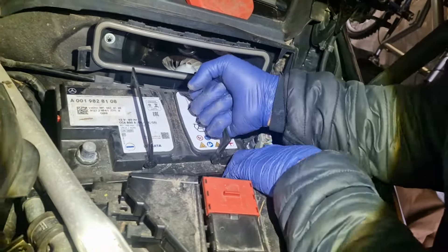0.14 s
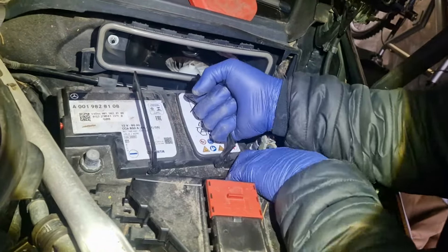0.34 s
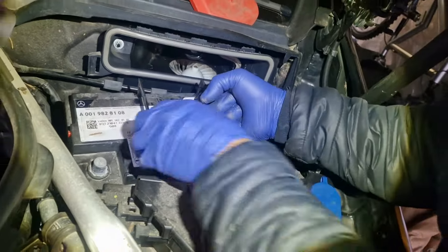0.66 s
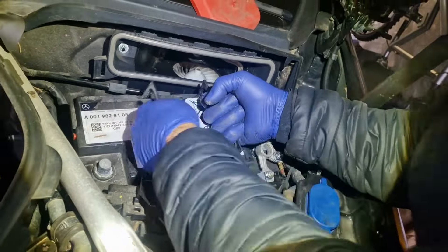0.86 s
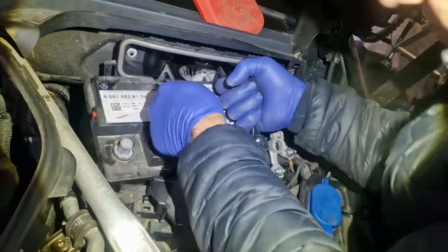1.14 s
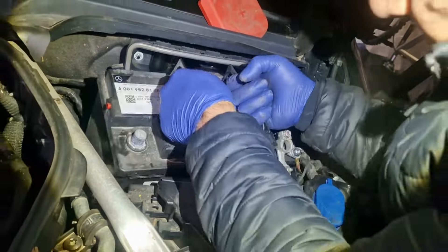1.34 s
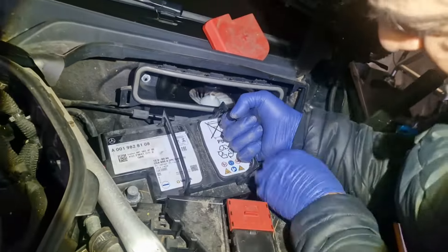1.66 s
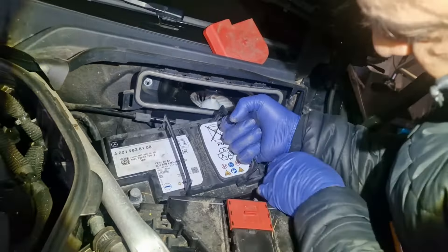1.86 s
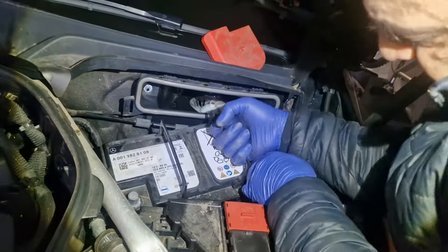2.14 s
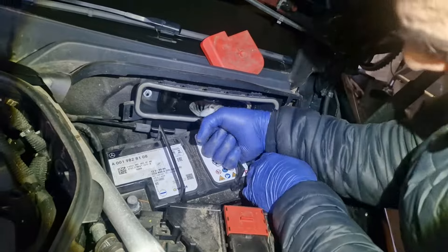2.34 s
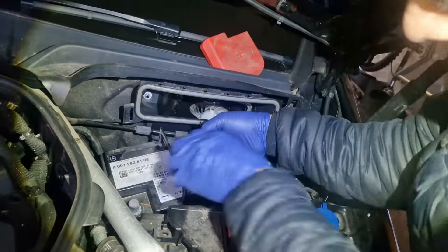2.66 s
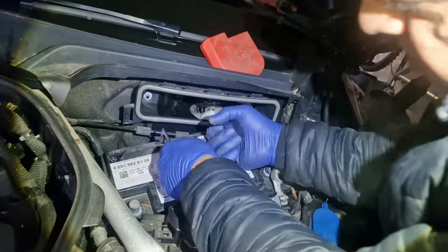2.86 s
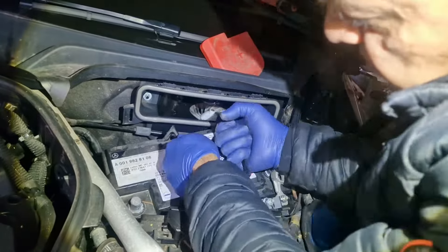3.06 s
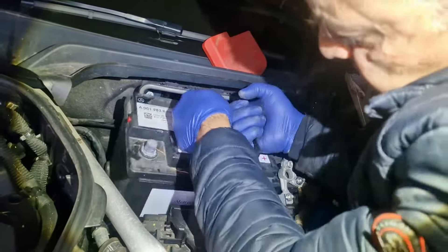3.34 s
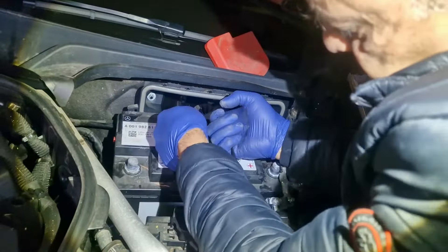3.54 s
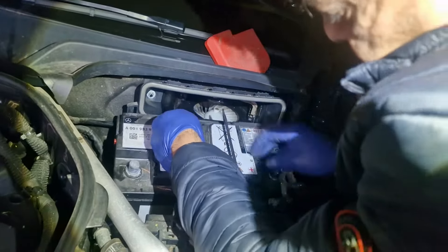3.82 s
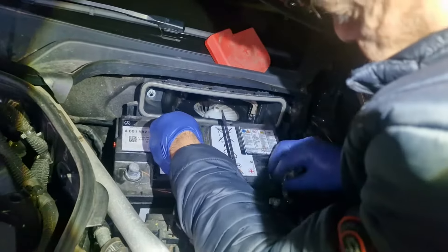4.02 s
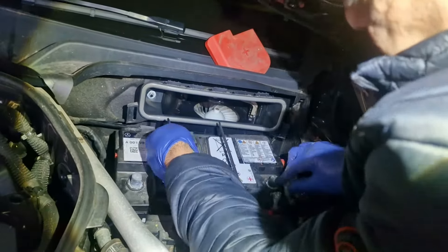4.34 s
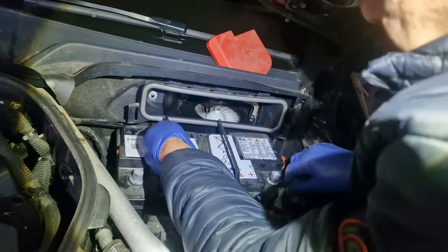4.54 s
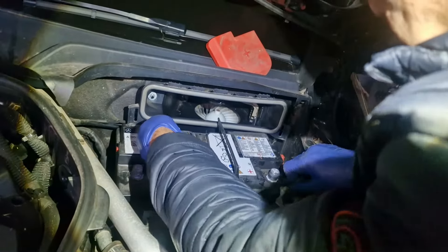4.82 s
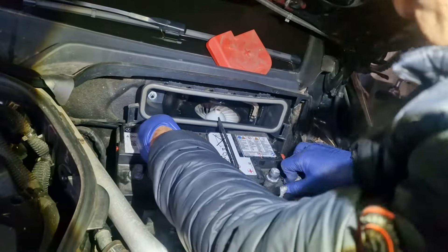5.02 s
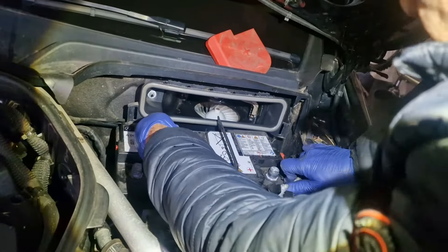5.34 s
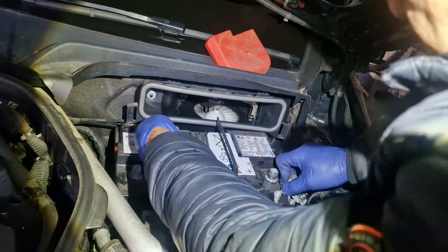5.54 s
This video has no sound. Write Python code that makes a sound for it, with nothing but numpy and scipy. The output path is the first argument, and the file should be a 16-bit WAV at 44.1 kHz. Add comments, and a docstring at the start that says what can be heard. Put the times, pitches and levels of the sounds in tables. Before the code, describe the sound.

A hard plastic case is shoved and bumped along its tray, grit crackling and clips snapping, while gloves and a padded jacket rustle. The action is dense, eases in the middle, grows forceful again, then thins to light rubbing and a faint rasp. Brief metal rattles and one thin scrape stand out. Close microphone, little background air, short hard reflections, occasional overload on the biggest blows.

```python
"""Engine bay, close up: gloved hands wrestle a heavy battery into its tray.
Blows chatter and ring the modes of the plastic case; stick-slip and noise drag it along the tray.
Grit and clips snap as swelling crackle, flickering noise bands make sleeves and gloves rustle.
A clamp scrapes once, a loose clip jangles, a thin rasp comes and goes (slips through resonances).
The car body booms; short reflections surround the hard sounds; the loudest blows clip at full scale."""
import sys
import numpy as np
from scipy import signal
from scipy.fft import rfft, irfft, next_fast_len
from scipy.io import wavfile
from scipy.ndimage import uniform_filter1d

SR = 44100
rng = np.random.default_rng(int(sys.argv[2]) if len(sys.argv) > 2 else 0)


def master(y):
    """Save y as 16-bit WAV."""
    cut = np.clip(np.atleast_2d(y).T, -1, 1)
    pcm = np.round(cut * 32767)  # scale
    wavfile.write(sys.argv[1], SR, pcm.astype(np.int16))


N = 250488

# steady air noise, spectrum: freq_hz, gain_db
AIR_SPECTRUM = [(35, 0), (60, -20.5), (118, -41), (862, -9), (991, -42), (6000, -38), (13900, -23),
                (16000, -47)]
AIR_LEVEL_DB = -54
# low noise of the car body, spectrum: freq_hz, gain_db
BOOM_SPECTRUM = [(20, 6), (45, -0.5), (60, 3), (100, -6), (130, -2), (200, -34)]
# full weight lands on the tray: start_s, peak_db
LANDINGS = [(0.791, -22), (2.524, -16.5), (2.619, -21.5), (4.191, -11.5), (4.262, -11), (4.36, -20.5)]
# car body modes: freq_hz, level_db, t60_s
BODY_MODES = [(55.7, -5, 0.73), (88, 2.5, 0.25), (129.7, -4.5, 0.33), (142, -2.5, 0.24)]

# sleeves and gloves rub past: start_s, end_s, level_db, swell_db (start to end), brightness_db
RUBS = [(0, 0.221, -37.5, 5, -4.5), (.225, .35, -46.5, 2, -4), (.35, 0.428, -56, 4, 0),
        (.43, 0.629, -36.5, 4, 2.5), (0.644, 0.955, -31.5, -0.5, -3), (0.932, 1.133, -42.5, -19, -6),
        (1.118, 1.424, -48, -2, -4), (1.469, 1.711, -42, 7, -13), (1.723, 2.107, -42, -3, -6.5),
        (2.103, 2.277, -43, 0, -2.5), (2.282, 2.408, -39.5, 0, -3), (2.413, 2.625, -46.5, 6, -3),
        (2.618, 2.817, -41.5, -1, -7), (2.822, 3.117, -36, 3, -3), (3.117, 3.371, -39.5, 8, -1.5),
        (3.401, 3.586, -39, -3.5, -4), (3.568, 3.685, -43.5, 2, -6.5), (3.686, 3.89, -31.5, 15.5, -1),
        (3.917, 4.121, -34, -7.5, -3.5), (4.12, 4.186, -46, -6, -7), (4.205, 4.33, -37.5, -9, -2),
        (4.346, 4.507, -47, -3, -2.5), (4.492, 4.706, -40, 14, -1), (4.7, 4.87, -45, 0, 0.5),
        (4.868, 5.093, -42.5, -12, 0.5), (5.098, 5.284, -58, -7, 0), (5.289, 5.457, -48.5, 5, -3),
        (5.454, 5.55, -36.5, 3, -1.5), (5.553, 5.703, -35.5, 2, 3)]
# glove scuff, spectrum: freq_hz, gain_db
SCUFF_SPECTRUM = [(700, 11.5), (1000, 11), (1500, 12), (2100, 7), (3000, -5.5), (4000, -71.5)]
# cloth rustle, spectrum: freq_hz, gain_db
CLOTH_SPECTRUM = [(1650, -19), (2800, -4), (3370, -1), (3940, -2), (4280, 0.5), (5070, -9), (5830, -5.5),
                  (7500, -7), (9750, -13.5), (16500, -120)]
# top end of the rustle, spectrum: freq_hz, gain_db
SHEEN_SPECTRUM = [(5500, -100), (7500, -13), (9700, 2), (12500, 10), (14700, 3.5), (16000, 6)]
SCUFF_BY_SHOVE_DB, SCUFF_BY_RUB_DB = -18.5, -1.5

# case shoved along the tray: start_s, end_s, level_db, swell_db (start to end), body_boom_db
SHOVES = [(0, 0.231, -30.5, -4.5, -33.5), (.23, .33, -42, 11, -49), (0.333, 0.394, -28, -5, -44),
          (0.432, 0.623, -31, -11, -44), (0.627, .78, -24.5, -1.5, -30.5), (0.782, 0.927, -32, 3, -39),
          (0.938, 1.323, -30.5, -11, -41.5), (1.322, 1.575, -38, 22, -42.5), (1.591, 1.704, -26, -4, -27),
          (1.724, 2.38, -42, -4, -44), (2.377, 2.74, -37.5, 3, -34), (2.7, 3.114, -38, 18, -51),
          (3.12, 3.24, -26.5, -6.5, -33), (3.233, 3.385, -23.5, 3, -30), (3.395, 3.616, -31, -5, -39),
          (3.62, 3.783, -43.5, -8, -51), (3.781, 3.903, -22, -1, -34), (3.91, 4.143, -30.5, 11, -53),
          (4.17, 4.347, -25.5, 0, -29), (4.362, 4.504, -47, -9, -36), (4.504, 4.637, -31, -7, -47),
          (4.65, 4.725, -31, 7, -49), (4.754, 5.08, -48.5, -2, -43), (5.176, 5.322, -41, -2, -34.5),
          (5.448, 5.703, -33, 17, -33)]
# drag noise, spectrum: freq_hz, gain_db
DRAG_SPECTRUM = [(53, -60), (90, -8.5), (253, 0), (387, -4), (565, -3.5), (620, -8), (679, -7.5),
                 (835, -22), (1400, -53), (1820, -60), (3080, -120)]
EDGE_S = 0.018  # onset and stop of a stroke
# floor added to the strokes: drag_db, scuff_db, cloth_db, sheen_db, boom_db
REST_LEVELS_DB = [-48, -60.5, -65.5, -76.5, -49.5]
JUDDER_DB, JUDDER_T60_S = -26.5, 0.11  # level re the blow, fade by 60 dB

# narrow rasp: start_s, end_s, level_db, swell_db (start to end)
RASPS = [(1.716, 2.05, -51, -7), (2.17, 2.406, -39.5, 9), (3.715, 3.892, -41, 3), (4.75, 5.116, -52, 5),
         (5.447, 5.7, -39, 8)]
RASP_HZ, RASP_WIDTH_HZ = 4250, 980  # width per resonance pass

# clamp resonances: freq_hz, width_hz (per pass), level_db
CLAMP_RINGS = [(6020, 540, 5), (6770, 1300, 3), (12700, 4200, -5)]
CLAMP_START_S, CLAMP_BITE_S, CLAMP_LENGTH_S = 4.513, 0.0053, 0.29
CLAMP_DB, CLAMP_FADE_DB_PER_S = -25.5, -130

# loose metal clip rattles: start_s, peak_db, t60_s
JANGLES = [(.178, -26, 0.2), (1.505, -17.5, 0.099), (1.522, -12, .05), (3.292, -17, 0.13)]
# clip modes: freq_hz, width_hz, level_db
CLIP_MODES = [(3700, 110, 5), (5570, 120, -14), (7150, 140, -5), (7530, 190, -1), (8460, 97, -0.5),
              (9900, 130, -25), (12200, 73, 7), (13100, 300, -14), (14700, 220, -24)]

# grit and clips letting go: start_s, peak_db (1.2-8 kHz), centre_hz, top_peak_db (above 8 kHz), t60_s
SNAPS = [(0.0217, -20.5, 3100, -19, 0.031), (0.0673, -24, 4310, -16, 0.024),
         (0.1018, -17.5, 4770, -10, 0.0098), (0.1596, -13, 1960, -7.5, 0.044),
         (0.171, -4.5, 2640, -9, 0.018), (.176, -7.5, 2750, -3.5, 0.038), (0.207, -4, 2270, -8, .008),
         (.2647, -23, 2000, -37, 0.013), (.2907, -21.5, 1970, -34, 0.0098),
         (0.2968, -25, 2200, -36, 0.0066), (0.353, -15.5, 2340, -25, 0.023), (0.431, -26, 2900, -31, 0.029),
         (0.4617, -9.5, 3170, -6, 0.056), (0.5954, -19, 3270, -14.5, 0.031), (0.656, -25, 2660, -21, 0.057),
         (.69, -29, 5030, -11, 0.033), (0.715, -5.5, 3770, 5, .045), (0.757, -15, 4020, -8, 0.043),
         (0.793, -19, 6600, -14, 0.046), (0.8295, -12.5, 5960, -6.5, .026), (0.9308, -1.5, 3470, 2, 0.053),
         (1.0296, -15, 2420, -34, 0.0087), (1.061, -9, 3950, -5, 0.034), (1.145, -18, 1990, -34, 0.038),
         (1.1616, -16.5, 1940, -36, 0.021), (1.243, -27, 3080, -39, 0.048), (1.472, -30, 4680, -39, .03),
         (1.5046, -26, 7550, -27, 0.051), (1.5197, -22.5, 3500, -14, 0.099),
         (1.597, -19.5, 2230, -30, 0.022), (1.613, -17.5, 3650, -24, .07),
         (1.6549, -18.5, 5640, -16.5, 0.025), (1.689, -21, 2840, -18, .02), (1.7747, -22, 4200, -26, .021),
         (1.8765, -32, 7000, -26, .01), (1.945, -24.5, 4580, -25, 0.018), (1.9584, -26, 3600, -42, .007),
         (2.018, -25, 3000, -30, .014), (2.028, -29, 7500, -20, 0.019), (2.262, -24, 3000, -38, .015),
         (2.5396, -7, 2000, -14, 0.025), (2.822, -36, 7000, -22, .03), (2.847, -24, 3740, -14, 0.014),
         (2.945, -22.5, 4010, -25, 0.05), (2.964, -20, 3970, -16, 0.031), (3.004, -33, 4270, -21, 0.017),
         (3.0272, -15.5, 2800, -26, 0.025), (3.066, -8, 5430, -6, 0.01), (3.081, -24, 2550, -26, 0.033),
         (3.1388, -21, 3600, -14, .04), (3.1523, -11.5, 2180, -15, 0.016),
         (3.2394, -19.5, 2010, -20, 0.031), (3.2926, -17.5, 5600, -10, 0.041),
         (3.3344, -5, 3100, -37, .015), (3.356, -20, 3110, -34, 0.042), (3.407, -24, 2920, -36, 0.036),
         (3.5702, 1.5, 2500, -1.5, 0.034), (3.819, -16, 2470, -28, .03), (3.837, -0.5, 3570, -12, .012),
         (3.8845, -11, 4000, -7, 0.051), (4.0887, -23, 6000, -27, 0.075), (4.1357, -5.5, 2440, -18, 0.038),
         (4.167, -25, 2480, -32, 0.021), (4.1865, -17.5, 2020, -41, 0.016), (4.2222, -15, 3800, -9, 0.07),
         (4.26, -22, 2590, -30, .01), (4.275, -18.5, 2980, -15, 0.052), (4.3086, -21.5, 3440, -9.5, .03),
         (4.5773, -21, 6400, -26, 0.027), (4.667, -4, 7900, -3.5, 0.021), (4.6867, -10.5, 7660, -11, .025),
         (4.6983, -1.5, 2390, -5.5, .029), (5.2534, -21, 4740, -38, .025), (5.4925, -23, 2720, -23, 0.03)]
HALF_SWELL_SHARE = 0.071  # half the swell time, re t60

# blows on the case: start_s, peak_db (before filters), centre_hz, t60_s (times mode share),
# breadth_ln (log pitch ratio; small = hollow)
THUDS = [(0.0586, 0.5, 255, 0.012, 0.85), (.173, 3.5, 610, 0.048, 0.53), (.208, -4.5, 830, 0.0063, .52),
         (.265, -15.5, 1010, 0.023, 0.47), (.342, -18, 210, 0.11, 0.47), (0.3551, 2.5, 454, 0.018, 0.34),
         (0.388, -14.5, 338, 0.027, 0.3), (.4316, -19, 529, 0.01, 0.37), (0.4647, -4, 524, 0.13, 1),
         (.5023, -13.5, 550, 0.13, 0.55), (.646, -7.5, 386, 0.032, 0.17), (.6873, -6, 408, .074, 0.17),
         (0.7175, -8.5, 633, 0.03, 0.45), (.743, -2, 365, 0.026, 0.31), (0.8326, -6.5, 210, 0.0074, .43),
         (0.9317, 6, 374, 0.037, 0.54), (0.9524, -8, 460, 0.18, 0.55), (1.0293, 2, 470, 0.022, 0.33),
         (1.04, -1, 393, 0.085, 0.59), (1.148, -12.5, 340, 0.04, .79), (1.1632, 2.5, 448, 0.062, 0.53),
         (1.1785, -2, 345, 0.029, 0.36), (1.1996, -4.5, 245, 0.053, 0.44), (1.236, -15.5, 338, 0.095, 0.73),
         (1.424, -19, 237, 0.024, 0.28), (1.5246, -12.5, 516, .044, 0.57), (1.5983, 1, 234, 0.017, 0.86),
         (1.615, -8, 476, 0.054, 0.51), (1.6596, -1.5, 418, 0.085, 0.37), (1.7187, -19.5, 373, 0.068, 0.27),
         (1.756, -15.5, 580, 0.05, 0.18), (1.776, -18.5, 686, 0.079, 0.31), (1.82, -16.5, 477, 0.044, 0.19),
         (2.035, -16, 354, 0.033, 0.36), (2.2405, -18, 258, 0.011, 0.37), (2.4, -17.5, 232, 0.034, 0.37),
         (2.43, -19, 306, 0.039, .62), (2.5213, -4.5, 188, 0.017, 0.63), (2.5408, 5.5, 514, 0.012, 0.26),
         (2.633, -17.5, 196, 0.029, 0.46), (2.9617, -15, 597, 0.014, .54), (3.027, -11, 880, 0.084, 0.36),
         (3.0771, -8.5, 412, 0.029, 0.89), (3.1322, -2, 221, 0.0091, 0.35), (3.139, -2.5, 767, 0.03, 0.21),
         (3.152, 4.5, 677, 0.049, 0.31), (3.2466, -3, 647, 0.053, 0.13), (3.2723, -5, 386, 0.031, 0.28),
         (3.2919, -3.5, 338, 0.028, 1), (3.338, 6.5, 310, 0.031, 0.91), (3.3637, -14.5, 333, 0.019, 0.55),
         (3.5362, -9.5, 314, .05, 0.78), (3.559, -3.5, 362, .03, 0.25), (3.5719, 2.5, 598, 0.048, 0.79),
         (3.585, -8.5, 938, 0.045, 0.051), (3.8106, -4.5, 246, .04, 0.49), (3.8366, -3, 324, 0.042, 0.37),
         (3.86, -11, 445, 0.076, 0.62), (3.9825, -14, 475, 0.092, 0.45), (4.097, -7.5, 616, 0.033, 0.23),
         (4.1117, -8, 317, 0.1, 0.65), (4.1393, 8, 794, 0.016, 0.17), (4.1891, -1, 480, 0.088, 0.39),
         (4.2359, -9.5, 324, 0.11, 1), (4.2597, 0.5, 460, 0.11, 0.42), (4.298, -3.5, 423, 0.1, 0.4),
         (4.3237, -15.5, 306, 0.16, 0.55), (4.513, -7.5, 368, 0.021, 0.5), (4.543, -20, 466, .017, .53),
         (4.5807, -6.5, 310, .022, 0.42), (4.629, -22, 326, .015, 0.43), (4.6678, -6.5, 480, 0.016, 0.81),
         (4.6805, -5, 487, 0.04, 0.87), (4.698, 9, 486, 0.0183, 0.49), (5.1865, -18.5, 316, 0.093, .24),
         (5.257, -10, 370, 0.032, 0.3)]
# case and tray modes: freq_hz, level_db, t60_share
CASE_MODES = [(145, -38.5, 0.54), (180, 7.5, 1.84), (224, 1.5, 0.77), (288.4, -6, 2.93), (323.6, 4.5, 0.91),
              (423.4, 7.5, 0.81), (470, 8, 0.86), (531, 6.5, 0.85), (613, 9.5, 0.72), (713, 9, 0.93),
              (782.6, 4, 1.1), (862.4, 3.5, 1.24), (963, 5, 0.86), (1066, 13.5, 0.91), (1224, -0.5, 1.7),
              (1352, 2.5, 0.48), (1373, 26, 0.17), (1740, 16, 0.73), (2200, 8, 0.67), (2480, -14, .4),
              (3080, -7, 0.47)]
CHATTER_AT_400_HZ_S, CHATTER_SLOPE = 0.005003, .6  # duller blows chatter longer

BAY_T60_S, BAY_DB = 0.052, -19
MIC_LOW_HZ, TOP_HZ = 60.4, 15650


def undb(db):
    """Amplitude gain of a level in dB."""
    return 10 ** (np.asarray(db) / 20)


def unit(x):
    """Scale to rms 1."""
    return x / np.sqrt(np.mean(x ** 2))


def fade60(t, t60_s):
    """Exponential decay, 60 dB in t60_s."""
    return np.exp(-np.log(1000) * t / t60_s)


def colour(x, spectrum):
    """Filter by (freq_hz, gain_db) points joined over log frequency; rms 1."""
    freq_hz, gain_db = np.transpose(spectrum)
    size = next_fast_len(len(x))
    log_hz = np.log(np.maximum(np.arange(size // 2 + 1) * SR / size, 1))
    gain = undb(np.interp(log_hz, np.log(freq_hz), gain_db))
    return unit(irfft(rfft(x, size) * gain, size)[:len(x)])


def ring(x, hz, width_hz):
    """Two-pole resonance, gain 1 at the centre."""
    return signal.lfilter(*signal.iirpeak(min(hz, SR / 2.3), max(hz / width_hz, .2), fs=SR), x)


def walk(rate_hz):
    """Random levels held for 1 / rate_hz and smoothed twice; spread near 1."""
    hold = int(SR / rate_hz)
    steps = np.repeat(rng.standard_normal(N // hold + 1), hold)
    return 1.41 * uniform_filter1d(uniform_filter1d(steps, hold), hold)[:N]


def grit(slips_per_s, spread_db, most=2.5):
    """Random slips, most small and a few large."""
    sign, when, size = rng.standard_normal(N), rng.random(N), rng.exponential(1, N)
    return sign * (when < slips_per_s / SR) * undb(spread_db * np.minimum(size, most))


def add(out, start_s, sound, peak_db):
    """Mix a sound in at a time with a given peak."""
    i = int(start_s * SR)
    out[i:i + len(sound)] += (sound * undb(peak_db) / np.abs(sound).max())[:N - i]


def strokes(start_s, end_s, level_db, swell_db):
    """Gain of strokes that set in, swell evenly in dB and stop."""
    t, gain = np.arange(N) / SR, np.zeros(N)
    for a, b, db, swell in zip(start_s, end_s, level_db, swell_db):
        on = slice(max(int(a * SR), 0), int(b * SR))
        gain[on] += undb(db + swell * ((t[on] - a) / (b - a) - .5))
    return uniform_filter1d(gain, max(int(EDGE_S * SR), 1))


def air():
    """Steady coloured noise."""
    return undb(AIR_LEVEL_DB) * colour(rng.standard_normal(N), AIR_SPECTRUM)


def body_boom():
    """Fluctuating low noise of the car body, driven by the shoves."""
    start_s, end_s, _, swell_db, boom_db = np.transpose(SHOVES)
    noise = colour(rng.standard_normal(N), BOOM_SPECTRUM) * undb(2.2 * walk(34))
    return noise * (strokes(start_s, end_s, boom_db, swell_db) + undb(REST_LEVELS_DB[4]))


def landings(push_s=0.0042):
    """A long soft push rings the car body modes."""
    out, t = np.zeros(N), np.arange(SR // 2) / SR
    detunes = rng.standard_normal((len(LANDINGS), len(BODY_MODES)))
    for (start_s, peak_db), detune in zip(LANDINGS, detunes):
        modes = np.zeros(len(t))
        for (hz, db, t60_s), e in zip(BODY_MODES, detune):
            modes += undb(db) * fade60(t, t60_s) * np.sin(2 * np.pi * hz * (1 + 0.04 * e) * t)
        add(out, start_s, modes * (1 - np.exp(-t / push_s)), peak_db)
    return out


def judder():
    """Gain of the shaking each blow leaves behind, fading exponentially."""
    blows = np.zeros(N)
    start_s, peak_db = np.transpose(THUDS)[:2]
    blows[(start_s * SR).astype(int)] = undb(peak_db + JUDDER_DB)
    return signal.lfilter([1], [1, -fade60(1 / SR, JUDDER_T60_S)], blows)


def shove_gain():
    """Gain of the case moving: shoves plus judder after blows."""
    start_s, end_s, level_db, swell_db, _ = np.transpose(SHOVES)
    return strokes(start_s, end_s, level_db, swell_db) + judder()


def crumple(x, flicker_db, rate_hz):
    """Folds open and close, so each narrow band flickers by itself."""
    out = np.zeros(N)
    for hz in 700 * 2 ** np.arange(0, 4.6, .25):
        out += undb(flicker_db * walk(rate_hz)) * ring(x, hz, hz / 5)
    return unit(out)


def sleeves_and_gloves():
    """Dense fibre slips, crumpled, heard as scuff, cloth and sheen; brighter rubs scuff less."""
    start_s, end_s, level_db, swell_db, bright_db = np.transpose(RUBS)
    dull = strokes(start_s, end_s, level_db - .5 * bright_db, swell_db)
    rub = strokes(start_s, end_s, level_db, swell_db)
    bright = strokes(start_s, end_s, level_db + bright_db, swell_db)
    rest = undb(REST_LEVELS_DB)
    fibres = crumple(grit(8000, 1.0), 3.05, 35) * undb(2.35 * walk(30))
    scuff_gain = undb(SCUFF_BY_SHOVE_DB) * shove_gain() + undb(SCUFF_BY_RUB_DB) * dull + rest[1]
    return (colour(fibres, SCUFF_SPECTRUM) * scuff_gain
            + colour(fibres, CLOTH_SPECTRUM) * (rub + rest[2])
            + colour(fibres, SHEEN_SPECTRUM) * (bright + rest[3]))


def drag():
    """Stick-slip rings the lower case modes over coloured friction noise."""
    slips = np.convolve(grit(500, 4.6), np.hanning(30), "same")  # each slip is a soft push
    ringing = sum(undb(db) * ring(slips, hz, hz / 9) for hz, db, _ in CASE_MODES[:13])
    friction = unit(ringing) + 1.7 * colour(rng.standard_normal(N), DRAG_SPECTRUM)
    return unit(friction) * undb(1.85 * walk(30)) * (shove_gain() + undb(REST_LEVELS_DB[0]))


def rasp():
    """Fine slips through one narrow resonance, passed twice."""
    x = ring(ring(grit(6000, 1.5), RASP_HZ, RASP_WIDTH_HZ), RASP_HZ, RASP_WIDTH_HZ)
    return unit(x) * undb(1.3 * walk(24.4)) * strokes(*np.transpose(RASPS))


def clamp():
    """Dense slips ring the thin metal; the scrape bites, fades and stops."""
    t = np.arange(N) / SR - CLAMP_START_S
    slips, rings = grit(3400, 1.4), np.zeros(N)
    for hz, width_hz, db in CLAMP_RINGS:
        x = slips
        for _ in range(3):
            x = ring(x, hz, width_hz)
        rings += undb(db) * x
    shape = np.clip(t / CLAMP_BITE_S, 0, 1) * (t < CLAMP_LENGTH_S)
    return unit(rings) * shape * undb(CLAMP_DB + CLAMP_FADE_DB_PER_S * np.maximum(t, 0))


def jangles(scatter_db=5.5, broken_db=5.5):
    out, t = np.zeros(N), np.arange(SR // 8) / SR
    steps = rng.standard_normal((len(JANGLES), len(t) // 128 + 1))
    bumps = np.repeat(steps, 128, axis=1)[:, :len(t)]
    noise = rng.standard_normal((len(JANGLES), len(t))) * undb(broken_db * bumps)
    struck = rng.standard_normal((len(JANGLES), len(CLIP_MODES)))
    for (start_s, peak_db, t60_s), x, sizes in zip(JANGLES, noise, struck):
        rattle = x * fade60(t, max(t60_s, .005))
        modes = np.zeros(len(t))
        for (hz, width_hz, db), e in zip(CLIP_MODES, sizes):
            modes += undb(db + scatter_db * e) * unit(ring(rattle, hz, width_hz))
        add(out, start_s, modes, peak_db)
    return out


def snaps(crackle_db=2.0, peak_share=4.0, tick_s=.003):
    """Crackling bursts that swell and die, with a coloured centre and their own top end."""
    out, t = np.zeros(N), np.arange(SR // 8) / SR
    shape = (len(SNAPS), len(t))
    noise = rng.standard_normal(shape) * undb(crackle_db * rng.exponential(1, shape))
    high = signal.butter(3, 8000, "high", fs=SR, output="sos")
    mid = signal.butter(2, [1200, 8000], "band", fs=SR, output="sos")
    for (start_s, peak_db, centre_hz, top_db, t60_s), x in zip(SNAPS, noise):
        half_s = max(HALF_SWELL_SHARE * t60_s, .0002)
        swell = np.sin(np.pi / 2 * np.minimum(t / (2 * half_s), 1)) ** 2
        x = x * swell * fade60(np.maximum(t - 2 * half_s, 0), max(t60_s, .002))
        x[int(2 * half_s * SR)] += tick_s / half_s  # the quicker the release, the more it is one tick
        centre = ring(x, centre_hz, centre_hz / 5)
        add(out, start_s, signal.sosfilt(mid, x + peak_share * centre), peak_db)
        add(out, start_s, signal.sosfilt(high, x), top_db)
    return out


def thuds(bounces=8, scatter_db=4.0, detune_share=0.042, push_cycles=0.27):
    """Each blow chatters briefly and rings the case modes around its own pitch."""
    out, t = np.zeros(N), np.arange(SR // 4) / SR
    hz, db, share = np.transpose(CASE_MODES)[:, :, None]
    # neighbouring modes move the struck spot in opposite ways
    side = (-1) ** np.arange(len(CASE_MODES))[:, None]
    chance = rng.standard_normal((len(THUDS), 2, len(CASE_MODES), 1))
    chatter = rng.random((len(THUDS), 2, bounces))
    for blow, (size, detune), (when, force) in zip(THUDS, chance, chatter):
        start_s, peak_db, centre_hz, t60_s, breadth_ln = blow
        near = 1 / (1 + (np.log(hz / centre_hz) / max(breadth_ln, .05)) ** 4 * 0.23)
        level = side * near * undb(db + scatter_db * size)
        tones = np.sin(2 * np.pi * hz * (1 + detune_share * detune) * t)
        modes = level * fade60(t, max(t60_s, .005) * share) * tones
        contact = np.zeros(SR // 10)
        chatter_s = CHATTER_AT_400_HZ_S * (400 / centre_hz) ** CHATTER_SLOPE
        contact[(chatter_s * when * SR).astype(int)] = force - .4
        contact[0] = 1.0
        # plastic gives: duller blows push for longer
        contact = np.convolve(contact, np.hanning(int(push_cycles * SR / centre_hz) + 3))
        add(out, start_s, signal.fftconvolve(modes.sum(axis=0), contact), peak_db)
    # a box this small radiates little deep bass
    return signal.sosfilt(signal.butter(4, 105, "high", fs=SR, output="sos"), out)


def bay(x):
    """Short reflections between engine, wings and bonnet: decaying coloured noise after 4 ms."""
    t = np.arange(SR // 3) / SR
    tail = colour(rng.standard_normal(len(t)), [(100, -23.5), (1000, 12), (4000, -10.0), (16000, 5.5)])
    tail = tail * fade60(t, BAY_T60_S) * (t > .004)
    return x + undb(BAY_DB) * signal.fftconvolve(x, tail / np.sqrt(np.sum(tail ** 2)))[:N]


def scene():
    """Sum of all sources; only the hard ones get bay reflections."""
    background = air() + body_boom() + landings()
    rubbing = sleeves_and_gloves() + drag() + rasp()
    hard = bay(clamp() + jangles() + snaps() + thuds())
    return (background + rubbing + hard)[None, :]


def record(dry):
    """The microphone loses deep bass, the converter clips hard at full scale, the top is cut."""
    bass = signal.butter(3, MIC_LOW_HZ, "high", fs=SR, output="sos")
    top = signal.ellip(10, .1, 60, TOP_HZ, fs=SR, output="sos")
    clipped = np.clip(signal.sosfilt(bass, dry), -1, 1)
    return signal.sosfilt(top, clipped)


dry = scene()
out = record(dry)
master(out)
```